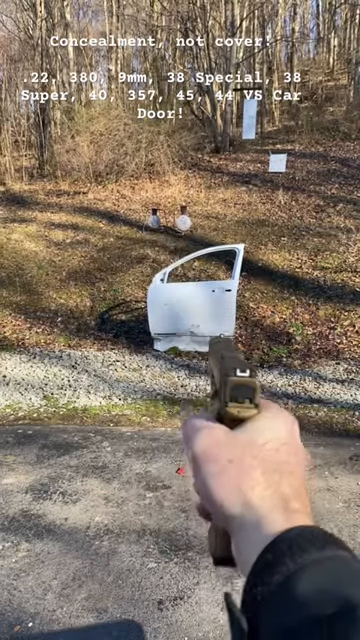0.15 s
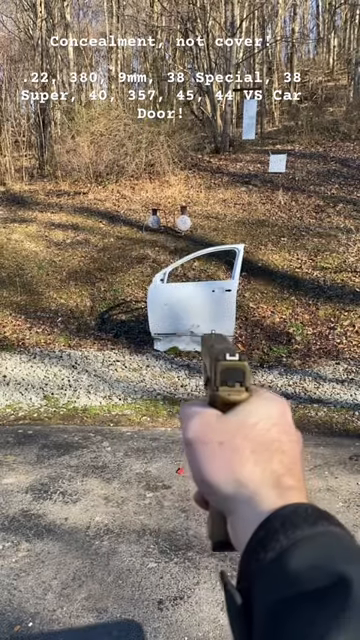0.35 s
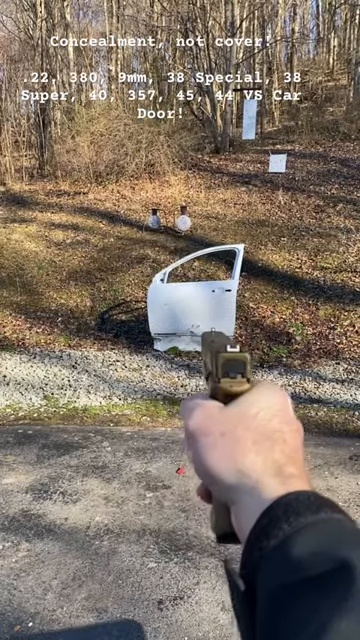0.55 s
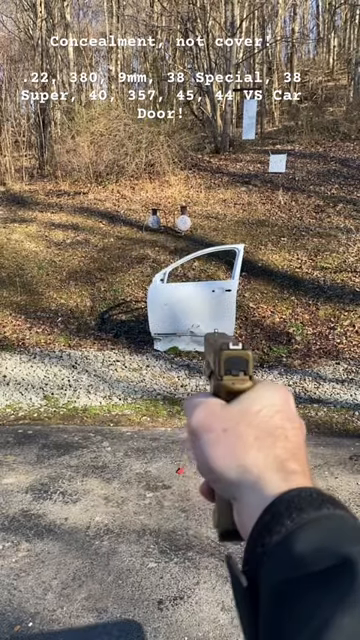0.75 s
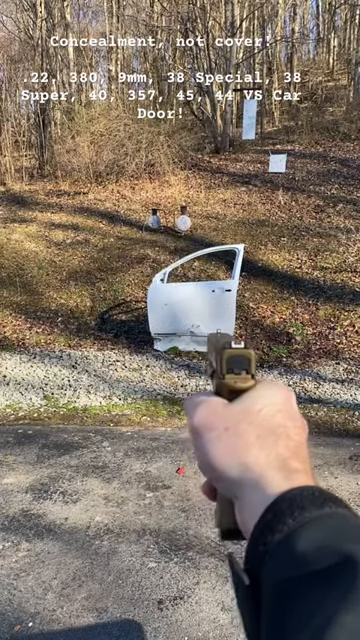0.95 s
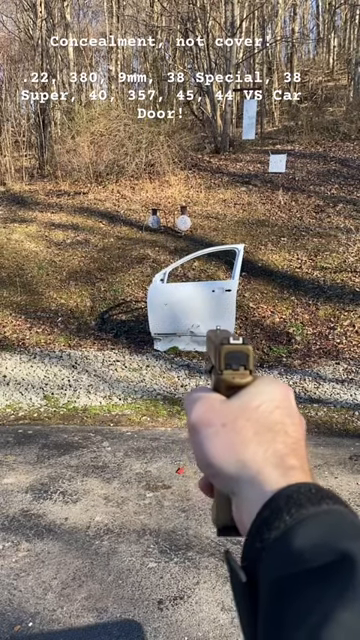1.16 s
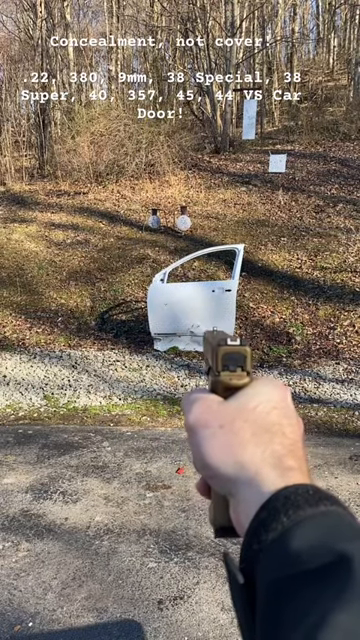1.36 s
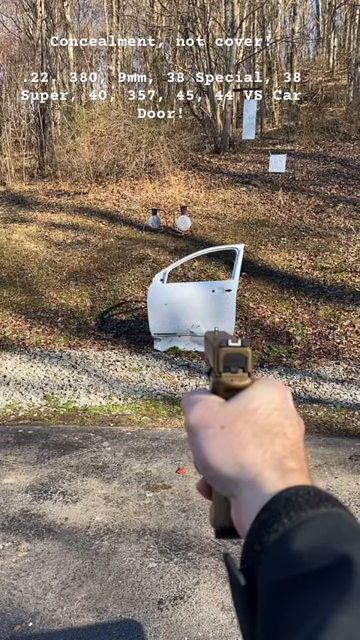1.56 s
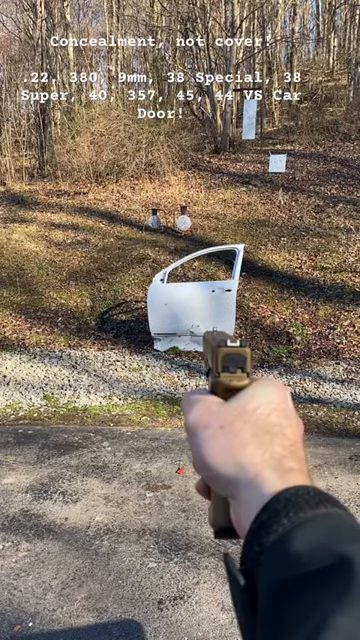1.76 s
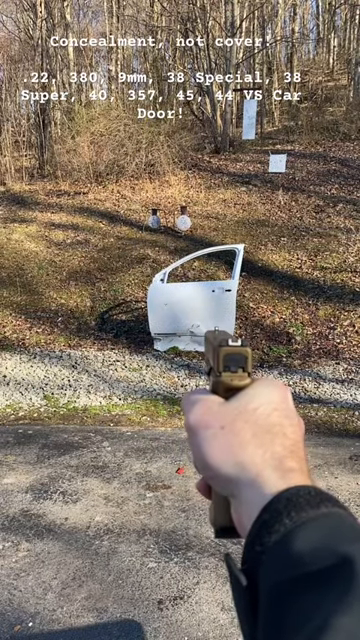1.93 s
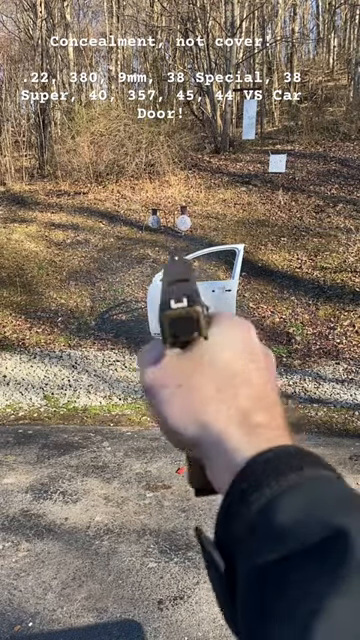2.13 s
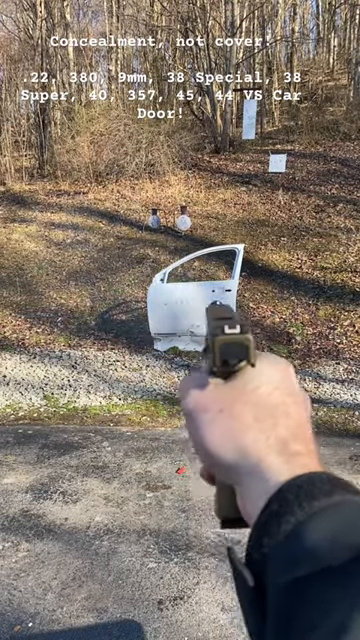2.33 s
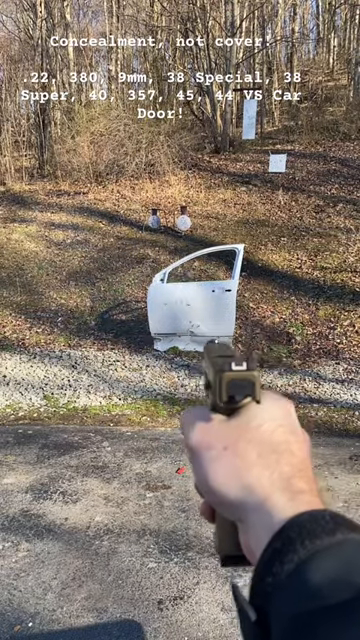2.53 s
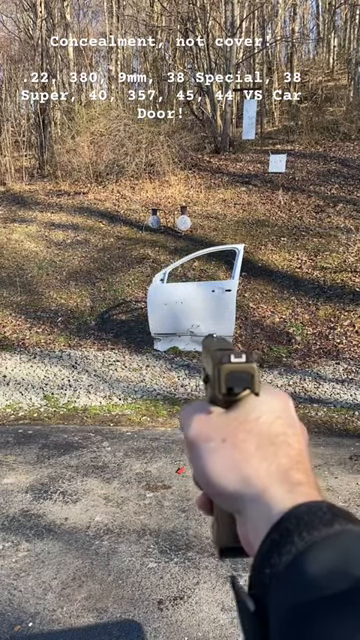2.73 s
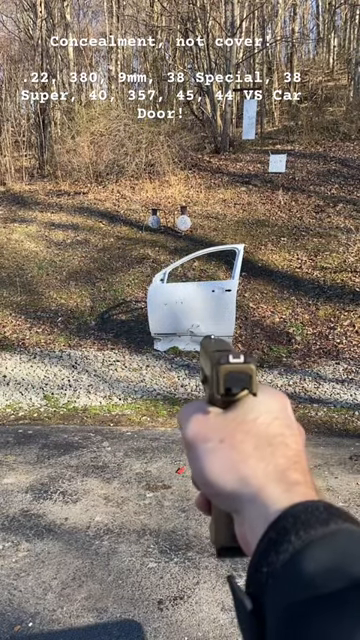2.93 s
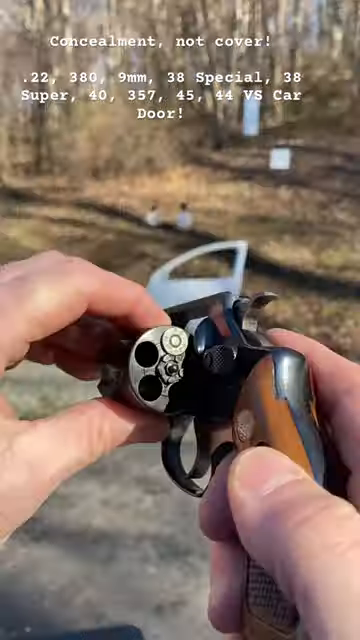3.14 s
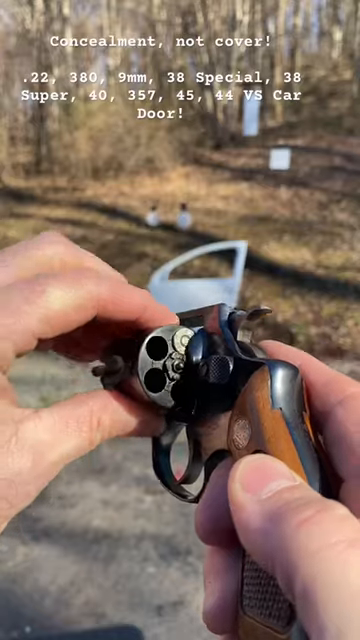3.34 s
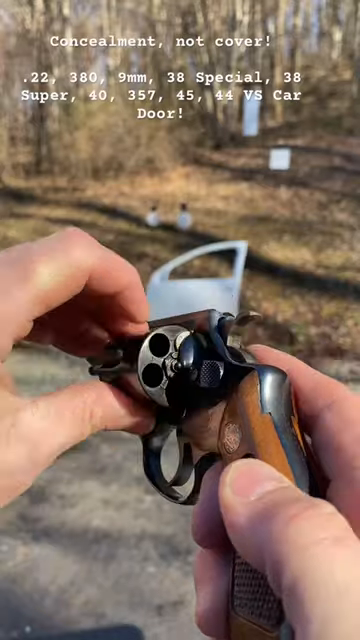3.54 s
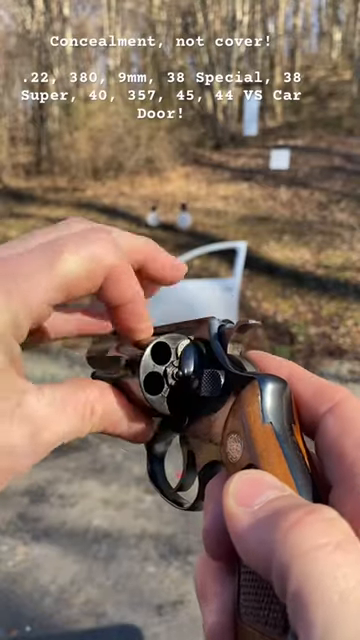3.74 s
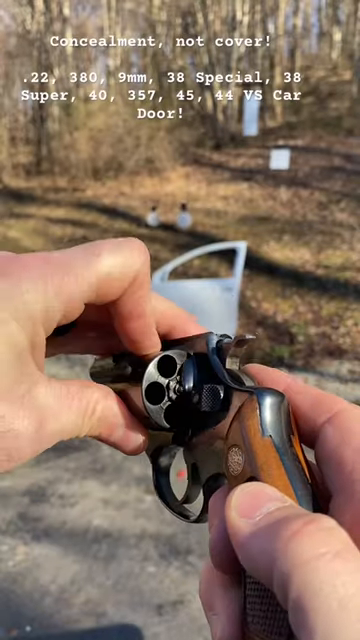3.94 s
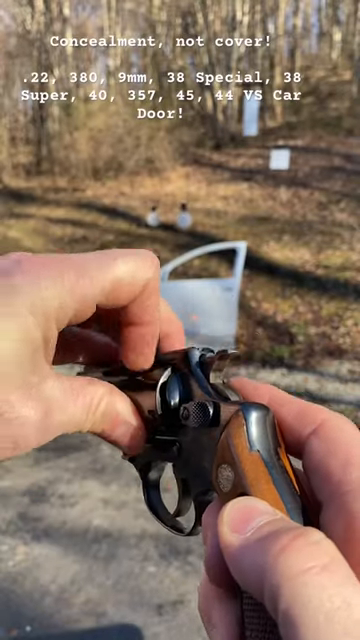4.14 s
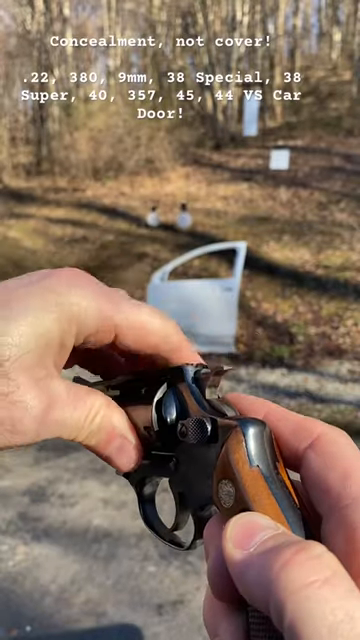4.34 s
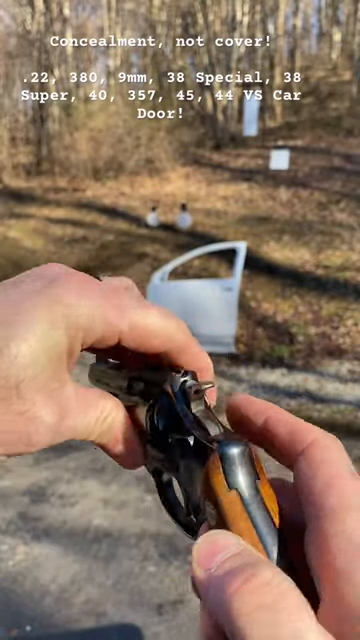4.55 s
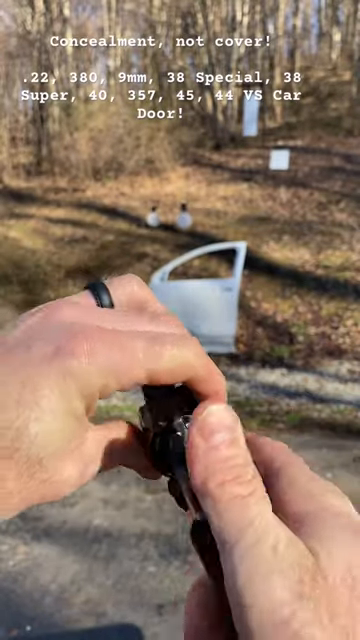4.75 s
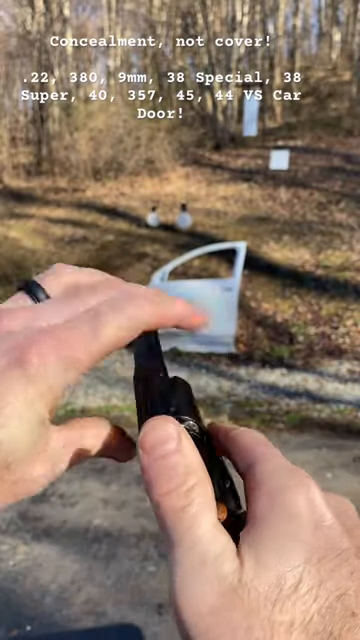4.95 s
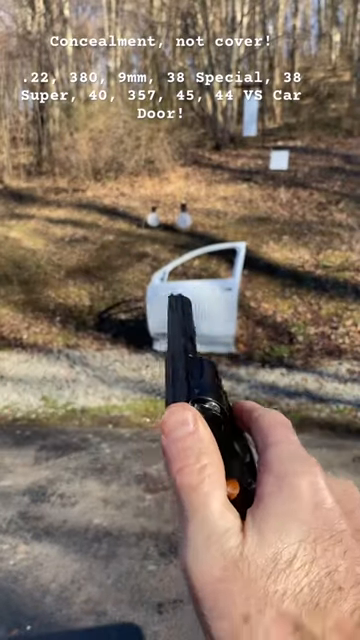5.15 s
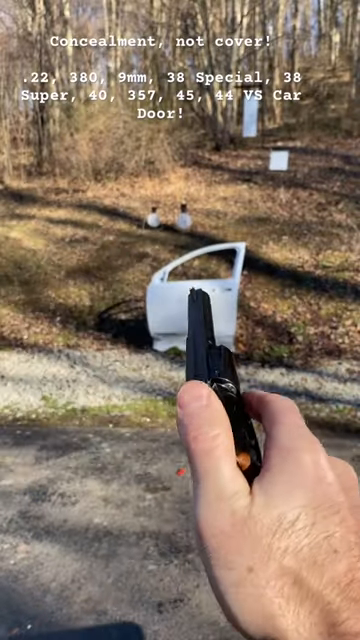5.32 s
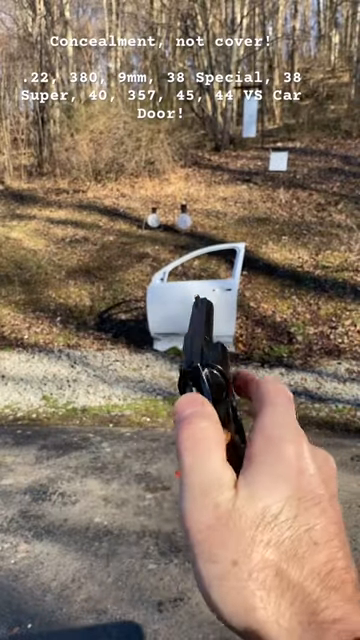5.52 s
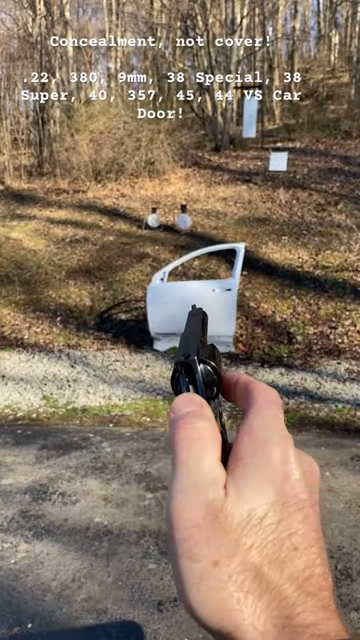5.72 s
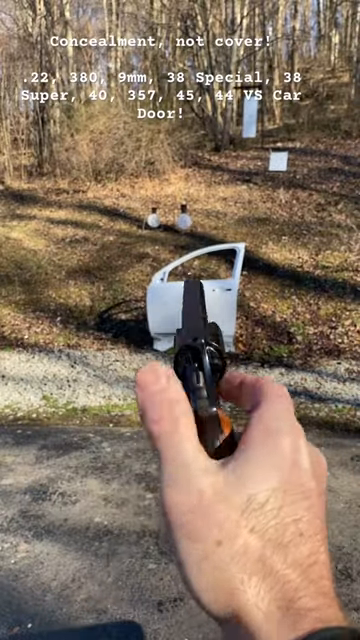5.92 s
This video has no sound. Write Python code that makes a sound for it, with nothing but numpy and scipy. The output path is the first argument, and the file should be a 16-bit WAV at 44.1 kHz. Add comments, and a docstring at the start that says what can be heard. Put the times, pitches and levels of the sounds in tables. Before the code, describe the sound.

Quiet wooded range, a single close gunshot with a metallic hit and rolling echo cut short, followed by crisp revolver handling clicks.

```python
"""Pistol shot, woodland echo, revolver handling

One pistol shot outdoors, heard from just behind the gun: shaped noise, chirps and pressure waves, rounded off
by overloaded microphones. The bullet slaps a car door (chirp, struck modes, rattle) and a wooded slope scatters
a long echo (filtered noise). The echo stops short and a revolver is handled: noise bursts ring its modes as
parts click and snap shut, and grainy noise makes the scuffs. Under it lie cloth rustle, faint high peeps,
rumble, air hiss and a distant hum."""
import sys
import numpy as np
from scipy import signal
from scipy.fft import rfft, irfft, next_fast_len
from scipy.io import wavfile
from scipy.ndimage import map_coordinates

SR = 44100
rng = np.random.default_rng(int(sys.argv[2]) if len(sys.argv) > 2 else 0)


def to_wav(sig):
    """Store sig (one row per channel, or 1-D mono) as 16-bit WAV at the path in sys.argv[1].

    Samples outside -1..1 are clipped; the rate is SR.
    """
    pcm = np.clip(np.atleast_2d(sig), -1, 1) * 32767
    pcm = np.round(pcm).astype(np.int16)
    wavfile.write(sys.argv[1], SR, pcm.T)  # frames by channels


N = 268113
T = np.arange(N) / SR
SHORT = T[:16384]  # time axis of a single event

SHOT_S, DOOR_S, CYLINDER_SHUT_S = 2.012, 2.0592, 3.967
# the echo and hum stop here, and the rumble and air step to their second level
BREAK_S = 3.132

# Spectra list f/Hz, level/dB per Hz, relative within each table.
# distant rumble
RUMBLE_TONE = [(20, -31), (32, -18), (42, -2), (70, 4.5), (125, -1), (160, -13), (250, -21), (600, -50.5),
               (3000, -85.5)]
# soft air hiss
AIR_TONE = [(60, -11.5), (200, 2.5), (400, -2), (1000, -4.5), (2200, -6.5), (4000, -15), (7000, -26.5),
            (9000, -37), (11000, -30.5), (16000, -46)]
# narrow band around the hum
DRONE_TONE = [(60, -43.5), (105, -18.5), (120, -2.5), (128, 0), (136, -7), (155, -20), (240, -52.5), (800, -89)]
# cloth and skin
RUSTLE_TONE = [(500, -11.5), (2000, -5.5), (4000, 1.5), (7000, 1.5), (9000, -12.5), (11000, -4),
               (16000, -30)]
# steel and skin scuffing
SCUFF_TONE = [(300, -29), (1000, -19), (1450, -2), (1900, -4), (2300, 2), (2750, 6), (3550, -11.5),
              (4350, 6.5), (5000, -1), (5900, -8.5), (6550, 5.5), (7300, -8), (8500, -20.5), (16000, -30.5)]
# skin part of a dull knock
SKIN_TONE = [(200, -2), (600, -10), (1100, 1), (2000, -4), (3200, -12), (6000, -34)]
# broad colour of a contact in the revolver
CONTACT_TONE = [(150, -28), (700, -15), (1000, -4.5), (1420, 1.5), (1800, -7), (2700, -3), (3850, -2.5),
                (4800, -1), (5500, 1.5), (7000, 6.5), (7750, 7), (8600, 2.5), (9500, -5), (10600, 5.5),
                (12200, -3.5), (13300, -10), (14500, 3), (15500, 1.5)]
# faint tail the ground returns after a contact
GROUND_TONE = [(500, -8), (1500, -6.5), (4000, 3.5), (7000, -3.5), (10000, -9.5), (16000, -16)]
# echo, before the path length recolours it
ECHO_TONE = [(40, -32.5), (100, -13.5), (200, -14), (355, -4.5), (620, -3.5), (850, -2.5), (1150, -4.5),
             (1460, -8.5), (2700, -13.3), (4340, -19.2), (7000, -29.3), (9000, -45), (11000, -44.5),
             (15500, -64)]
# distinct answers within the echo, before dulling
SLAP_TONE = [(80, -24.5), (190, 3), (330, 11.5), (750, 14), (1200, 14), (16000, -1.5)]
# first tick of the bullet on sheet steel
TICK_TONE = [(800, -11), (2000, -1), (4300, 0), (5500, -12.5), (7000, -7), (9000, -17.5), (16000, -23)]
# rattle of the door
RATTLE_TONE = [(60, -3), (300, -.5), (700, -1), (2000, -5.5), (4200, -12), (7000, -16), (9000, -27),
               (11000, -17.5), (16000, -33)]
# muzzle crack, before its resonances
CRACK_TONE = [(40, -10.5), (150, -10.5), (300, -2.5), (430, 1.5), (650, 4), (1000, -3), (1500, -16),
              (3000, -13.5), (4400, -14.5), (5900, -14.5), (7500, -16), (8700, -35.5), (16000, -42.5)]
# snap after the crack
SNAP_TONE = [(300, 0), (700, 6.5), (1500, -3), (4000, -4.5), (7000, 0), (9000, -13.5), (10500, 6),
             (13000, -9), (15500, -6.5)]
# gas and ground wash after the crack
WASH_TONE = [(30, -2), (90, -1), (170, -9), (300, -2), (700, -3.5), (1400, -8.5), (3000, -13),
             (6500, -15.5), (9000, -28), (11000, -22.5), (16000, -30)]
# bright spray off nearby gravel and leaves
SPRAY_TONE = [(300, -11), (1000, -.5), (4000, -6.5), (7000, -7), (9000, -13.5), (11000, -11.5), (16000, -16.5)]
# gravel and leaves stirred by the blast
STIR_TONE = [(400, -12.5), (1500, 0), (4000, -3), (8000, -15), (16000, -26.5)]

# stereo tilt of the crack: f/Hz, left minus right level/dB
CRACK_PAN = [(100, 8.5), (380, 6.5), (900, 3.5), (1400, 0), (2400, -10), (4400, -7.5), (8000, -3.5)]
# resonances of the crack: f/Hz, nominal width/Hz, level above the valleys/dB
CRACK_PEAKS = [(1970, 90, 10), (2350, 190, 10.5), (3090, 80, 14.5), (3400, 80, 11.5), (4030, 130, 16.5),
               (4950, 100, 11.5), (5400, 90, 9.5), (5800, 98, 16), (6310, 240, 14), (6650, 200, 12),
               (7600, 200, 10)]
# struck modes of the door's steel skin: f/Hz, level/dB, t60/s
DOOR_MODES = [(385, -5.5, 0.1), (640, -2, 0.066), (1340, -3.5, 0.063), (2090, -2.5, 0.03), (3300, -8, .04),
              (3920, -2, .04), (4330, -4, 0.046), (6530, -10.5, .04), (6740, -7.5, .045)]
# struck modes of the revolver, damped by the hand: f/Hz, level/dB, t60/s
GUN_MODES = [(1440, 4, 0.016), (2100, -9, .025), (2675, -4.5, 0.019), (3160, -2, 0.02), (3880, -1, 0.022),
             (4740, 4, 0.0083), (4620, -4.5, 0.022), (6020, 3.5, 0.019), (7130, -6, 0.027),
             (8240, 1.5, 0.017), (10620, -6, 0.014), (15250, -1.5, 0.0073)]
# faint ring of the cylinder once shut: f/Hz, level/dB, t60/s
CYLINDER_MODES = [(2616, -54.5, .078), (3730, -55.5, .22), (6710, -45, .05), (7138, -50, .055)]
# banks and stands of trunks that answer distinctly: t/s, length/s, level/dB, dull above f/Hz
SLAPS = [(2.079, 0.013, -29, 990), (2.106, 0.0075, -30.5, 1200), (2.1636, .002, -31.5, 2200),
         (2.224, 0.0074, -35.5, 600), (2.243, .012, -30, 1120), (2.266, .01, -33, 1500),
         (2.287, .012, -26, 520), (2.333, 0.021, -35, 1500), (2.364, 0.021, -28.5, 1390),
         (2.401, .016, -28, 615), (2.429, 0.0075, -33, 1000), (2.458, 0.013, -28.5, 603),
         (2.481, .008, -34.5, 1100), (2.557, 0.0069, -32, 790)]
# metal contacts in the gun: t/s, level/dB, centre f/Hz, spread/octaves, left minus right level/dB
CLICKS = [ (2.989, -55, 6950, 1.1, 4), (3.122, -45, 7000, 1.2, -1), (3.4175, -52.5, 4500, 2.2, 1),
          (3.4407, -35.5, 5030, 0.66, -1), (3.4412, -42, 1430, 0.68, 2), (3.9412, -27, 3300, 1.1, -3.5),
          (3.945, -33.5, 1390, 1.06, -1), (3.9505, -41, 13050, 1.2, 6), (3.9641, -13.5, 10500, .8, -5),
          (3.9646, -20, 2840, 0.31, -4), (3.967, -17, 6330, 0.43, -3), (3.9669, -14.5, 11000, 2.4, 9),
          (3.9684, -21, 3000, 2, 0), (4.122, -56, 9040, 0.78, 6.5), (4.498, -59, 4000, 1.1, 7),
          (4.829, -56.5, 4800, 1.0, 2.5), (5.4368, -38.5, 6800, 0.87, -5), (5.4478, -46.5, 4500, 1.1, 14),
          (5.462, -44, 10030, .7, -12), (5.465, -31, 6500, 0.53, 3), (5.4735, -50, 7970, 1.13, 1),
          (5.4997, -26, 8300, 0.67, 4.5), (5.5006, -25, 3380, 0.7, 2), (5.5002, -39, 1600, 0.5, 0),
          (5.503, -29, 6000, 0.57, 4), (5.5078, -39, 3700, 0.9, -6), (5.522, -13.5, 4680, 0.43, 2.5),
          (5.5217, -19, 8660, 0.21, 3.5), (5.522, -27, 6500, 1.6, -4), (5.5221, -32, 1900, 0.8, -1),
          (5.5248, -24, 7500, 0.56, 4), (5.5298, -35, 4700, 0.4, -4), (5.5322, -43, 6400, 0.35, -1),
          (5.817, -56, 3400, 0.56, -1), (5.833, -45, 4560, 0.45, 2), (5.8365, -41.5, 3700, .55, 1),
          (5.8423, -39.5, 2680, 0.13, -1), (5.843, -43, 6300, 0.25, 1), (5.8565, -59, 1450, 0.32, -1),
          (5.8753, -50, 1620, 0.64, -8)]
# tinkles of a loose steel part: t/s, level/dB
TINKLES = [(4.492, -55.5), (4.499, -54), (4.511, -56)]
# dull knocks of the gun in the hand: t/s, level/dB, t60/s
THUMPS = [(3.441, -56.5, 0.071), (3.965, -36.5, 0.057), (5.521, -57.5, 0.033), (6.013, -51, .025)]
# sliding parts and the hand on the grip: start t/s, time to full pressure/s, level/dB, t60/s
SCUFFS = [(3.94, 0.024, -39.5, 0.028), (5.436, 0.012, -56.5, 0.17), (5.485, 0.03, -48.5, .09),
          (5.806, 0.02, -56.5, 0.096), (5.829, 0.01, -45.5, 0.14), (5.852, 0.019, -58, 0.047),
          (6.012, 0.016, -60, 0.16)]
# moving sleeves and hands: start t/s, length/s, level/dB
RUSTLES = [(0, 0.5, -75.5), (2.701, 1.08, -75.5), (3.95, 0.5, -76), (4.429, 0.8, -72.5), (5.206, 1.08, -72)]
# faint high peeps: t/s, level/dB
PEEPS = [(.765, -83), (1.005, -81), (1.885, -82), (3.803, -65.5)]
# swells of the hum: loudest at t/s, half width/s, level/dB
DRONE_SWELLS = [(.05, 0.17, -63.5), (1.23, 0.15, -55.5), (1.88, 0.099, -55)]
# the background sinks for a while: start t/s, length for the air/s, length for the rumble/s, depth/dB
SINKS = [(2.019, 1.1, 1.085, 7), (3.985, .11, 0.26, 5.5)]

# background levels before and after BREAK_S
RUMBLE_DB, AIR_DB = (-59, -56.5), (-66.5, -63)
SINK_FADE_S, RUSTLE_FADE_S = .03, .049
DRONE_REST_DB, PEEP_HZ = -71.5, 7700
# a scuff is a dense run of slips of somewhat unequal size
SLIPS_PER_S, SLIP_SCATTER_DB, SLIP_T60_S = 1500, 3, .005
# every contact dies fast; a much weaker second tap is added just after it
CLICK_T60_S, SECOND_TAP_S, SECOND_TAP_DB, KNOCK_DB = .005, .0028, -16.5, -39
TREBLE_SPREAD = 1.05  # a contact's spread above its centre, relative to below
TINKLE_HZ, TINKLE_T60_S = 3470, .017
RIGHT_LAG_S = .000056  # the right channel hears the gun's sounds slightly later than the left
# the slope's echo builds up as the blast reaches more trunks, peaks, then dies away
ECHO_DB, ECHO_PEAK_S, ECHO_BUILD_DB_PER_S, ECHO_T60_S = -29, 2.361, 50.5, 2.465
ECHO_GRAIN_DB = 1.9
# the nearer bank answers first: level at the shot, and decay
BANK_DB, BANK_T60_S = -25.5, .34
CRACK_RISE_S = .005
TOP_HZ = 16200


def undb(db):
    """Decibels to gain."""
    return 10 ** (np.asarray(db) / 20)


def unit(x):
    """Scale to rms 1."""
    return x / np.sqrt(np.mean(x ** 2))


def bins(size):
    """Frequencies of a spectrum, kept off zero for the logarithm."""
    return np.maximum(np.fft.rfftfreq(size, 1 / SR), 1)


def tone(points, f):
    """A spectrum in dB, read on a log-frequency axis."""
    hz, db = np.transpose(points)
    return np.interp(np.log(f), np.log(hz), db)


def colour(x, db):
    """Causal filter with a gain in dB per bin, by folding the cepstrum."""
    size = x.shape[-1]
    fold = 1 + np.sign(size / 2 - np.arange(size))
    fold[0] = 1
    cepstrum = irfft(np.log(undb(db)), size)
    response = np.exp(rfft(cepstrum * fold))
    return irfft(rfft(x) * response, size)


def noise(points, size, apart_hz):
    """Stereo noise of a given spectrum: alike in both channels below apart_hz, unrelated above."""
    length = next_fast_len(size, True)
    f = bins(length)
    mid, side = np.exp(2j * np.pi * rng.random((2, len(f))))
    alike = 1 / (1 + (f / apart_hz) ** 2)
    pair = mid * np.sqrt(1 + alike) + side * np.sqrt(1 - alike) * np.array([[1], [-1]])
    return unit(irfft(pair * undb(tone(points, f)), length)[:, :size])


def walk(rate):
    """Smooth random drift with a spread near 1, changing rate times a second."""
    return 1.2 * np.interp(T * rate, np.arange(8192), rng.standard_normal(8192))


def swell(rise, hold, t60):
    """An envelope that rises, holds and dies away."""
    return np.minimum(SHORT / rise, 1) * undb(-60 * np.maximum(SHORT - rise - hold, 0) / t60)


def gate(start, length, fade):
    """1 during a stretch of time, with a soft edge on either side."""
    return np.clip(np.minimum(T - start, start + length - T) / fade + .5, 0, 1)


def ring(hz, t60):
    """One struck mode: a sine that dies away exponentially."""
    return np.sin(2 * np.pi * hz * SHORT) * np.exp(-np.log(1000) * SHORT / t60)


def ring_modes(modes):
    """All modes of a struck body together."""
    return sum(undb(db) * ring(hz, t60) for hz, db, t60 in modes)


def chirp(from_hz, to_hz, glide):
    """A tone that falls quickly from one pitch towards another."""
    hz = to_hz + (from_hz - to_hz) * np.exp(-SHORT / glide)
    return np.sin(2 * np.pi * np.cumsum(hz) / SR)


def pressure(push, round_hz):
    """Blast wave: a brief push, then a longer suction, with a rounded front."""
    wave = (1 - SHORT / push) * np.exp(-SHORT / push)
    wave = signal.sosfilt(signal.butter(2, round_hz, fs=SR, output="sos"), wave)
    return wave / wave.max()


def even(x):
    """Smooth the chance bumps out of a short burst's spectrum; its phase and energy stay."""
    spectrum = rfft(x)
    size = np.abs(spectrum)
    y = irfft(spectrum / (size + .25 * size.mean()), x.shape[-1])
    return y * np.sqrt(np.sum(x ** 2) / np.sum(y ** 2))


def resonances(peaks, f):
    """Gain in dB of a set of resonances standing above a flat valley."""
    power = 1
    for hz, width, db in peaks:
        power = power + undb(db) ** 2 / (1 + ((f - hz) / (.7 * width)) ** 2) ** 2
    return 10 * np.log10(power)


def pan(db):
    """Gains of the two channels for a left minus right level."""
    return undb(np.array([[1], [-1]]) * db / 2)


def add(out, s, x):
    """Mix a sound in at time s."""
    i = int(s * SR)
    out[:, i:i + x.shape[-1]] += x[..., :N - i]


def outdoors():
    """A wavering distant rumble and soft air hiss, both shaped noise; their levels sink for a while."""
    rumble = noise(RUMBLE_TONE, N, apart_hz=278.9)
    rumble = rumble * undb(np.where(T < BREAK_S, *RUMBLE_DB) + 1.4 * walk(rate=13))
    air = noise(AIR_TONE, N, apart_hz=430) * undb(np.where(T < BREAK_S, *AIR_DB))
    for s, air_s, rumble_s, db in SINKS:
        air = air * undb(-db * gate(s, air_s, SINK_FADE_S))
        rumble = rumble * undb(-db * gate(s, rumble_s, SINK_FADE_S))
    return rumble + air


def drone():
    """A far-off hum that comes and goes: a wavering tone in a narrow band of rumble."""
    band = noise(DRONE_TONE, N, apart_hz=500)
    hum_hz = 128 + 1.5 * walk(rate=12)
    hum = np.sin(2 * np.pi * np.cumsum(hum_hz) / SR)
    swells = sum(undb(db) * np.exp(-.5 * ((T - s) / width) ** 2) for s, width, db in DRONE_SWELLS)
    return (.64 * band + hum) * (undb(DRONE_REST_DB) + swells) * (T < BREAK_S)


def peep():
    """Faint, very high peeps, likely a small bird: a sine glides down and wavers in pitch."""
    out = np.zeros((2, N))
    for s, db in PEEPS:
        hz = PEEP_HZ + 400 * np.exp(-SHORT / .01) + 130 * walk(rate=450)[:len(SHORT)]
        whistle = np.sin(2 * np.pi * np.cumsum(hz) / SR)
        add(out, s, undb(db) * whistle * swell(rise=.015, hold=.011, t60=.09))
    return out


def rustle():
    """Cloth and skin brush softly and unevenly while the hands move: noise of drifting level."""
    moving = sum(undb(db) * gate(s, length, RUSTLE_FADE_S) for s, length, db in RUSTLES)
    return noise(RUSTLE_TONE, N, apart_hz=1500) * moving * undb(1.3 * walk(rate=28))


def scuff():
    """Steel and skin stick and slip on the gun: pressure builds, then lets go."""
    press = np.zeros((1, N))
    for s, rise, db, t60 in SCUFFS:
        add(press, s, undb(db) * swell(rise=rise, hold=.003, t60=t60))
    slips = (rng.random(N) < SLIPS_PER_S / SR) * undb(SLIP_SCATTER_DB * rng.standard_normal(N))
    slips = signal.fftconvolve(slips, swell(rise=.00019, hold=0, t60=SLIP_T60_S))[:N]
    return unit(noise(SCUFF_TONE, N, apart_hz=2960) * slips) * press * pan(-5.5)


def thumps():
    """Dull knocks of the gun against the hand: a tone falls quickly in pitch under a puff of noise."""
    out = np.zeros((2, N))
    for s, db, t60 in THUMPS:
        knock = chirp(from_hz=940, to_hz=115, glide=.0052) * swell(rise=.0047, hold=.0017, t60=t60)
        skin = noise(SKIN_TONE, len(SHORT), apart_hz=3000) * swell(rise=.001, hold=.0012, t60=.015)
        add(out, s, undb(db) * (knock + undb(-4) * skin))
    return out


def handling():
    """Each contact is a short burst and a weak second tap with the gun's modes and a faint ground tail."""
    out, size = np.zeros((2, N)), len(SHORT)
    f = bins(size)
    rings = np.array([undb(db) * ring(hz, t60) for hz, db, t60 in GUN_MODES])
    knock = ring(hz=330, t60=.0049) + .31 * ring(hz=215, t60=.038) + .5 * ring(hz=542, t60=.018)
    tap = swell(rise=.00039, hold=.00049, t60=CLICK_T60_S)
    taps = tap + undb(SECOND_TAP_DB) * np.interp(SHORT - SECOND_TAP_S, SHORT, tap)
    for s, db, hz, spread, pan_db in CLICKS:
        octaves = np.log2(f / hz) / np.where(f > hz, TREBLE_SPREAD, 1)
        contact_db = -np.minimum(4.35 * (octaves / spread) ** 2, 45)
        burst = even(rng.standard_normal(size) * taps) * (SHORT < .02)
        burst = colour(burst, tone(CONTACT_TONE, f))
        # every contact meets the modes at another spot
        modes = rng.uniform(.6, 1.4, (2, len(rings))) * rng.choice([-1, 1], len(rings))
        tail = noise(GROUND_TONE, size, apart_hz=1000) * swell(rise=.0045, hold=.0036, t60=.14)
        click = colour(burst + undb(-19.5) * modes @ rings + undb(-45) * tail, contact_db)
        # level the click's energy, as if spread over 3 ms
        click /= np.sqrt(np.sum(click ** 2) / (2 * .003 * SR))
        add(out, s, undb(db) * pan(pan_db) * (click + undb(KNOCK_DB) * knock))
    # the cylinder's snap leaves a thin steel ring
    add(out, CYLINDER_SHUT_S, ring_modes(CYLINDER_MODES))
    for s, db in TINKLES:
        add(out, s, undb(db) * ring(TINKLE_HZ, TINKLE_T60_S))
    late_right = map_coordinates(out[1], [(T - RIGHT_LAG_S) * SR], order=5)
    return np.array([out[0], late_right])


def echo_level():
    """The near bank's quick decay, plus the slope's slow bloom and fall."""
    late = T - ECHO_PEAK_S
    slope = undb(ECHO_DB + np.minimum(ECHO_BUILD_DB_PER_S * late, -60 * late / ECHO_T60_S))
    bank = undb(BANK_DB) * np.exp(-np.log(1000) * np.maximum(T - SHOT_S, 0) / BANK_T60_S)
    return np.hypot(slope, bank)


def woods():
    """Countless trunks scatter the shot as noise; the longer the path, the more treble the air takes."""
    scatter = noise(ECHO_TONE, N, apart_hz=686) * undb(ECHO_GRAIN_DB * walk(rate=400))
    f, s, frames = signal.stft(scatter, SR, nperseg=512)
    path = np.clip(s - 2.4, -.4, .8)  # travel time in s, relative to about the echo's peak
    loss_db = 8.1 * (f[:, None] / 2000) ** 1.49 * path
    thin_db = 8 * np.maximum(path, 0) / (1 + (f[:, None] / 190) ** 4)  # far trunks return little bass
    frames = frames * undb(-np.maximum(loss_db, -11) - thin_db)
    scatter = signal.istft(frames, SR, nperseg=512)[1][:, :N]
    out = scatter * echo_level() * np.clip((T - DOOR_S) / .013, 0, 1)
    f = bins(len(SHORT))
    for s, length, db, dull_hz in SLAPS:
        slap = noise(SLAP_TONE, len(SHORT), apart_hz=900)
        slap = unit(colour(slap, -10 * np.log10(1 + (f / dull_hz) ** 3)))
        add(out, s, undb(db) * slap * swell(rise=.003, hold=length, t60=.035))
    return out * np.clip((BREAK_S - T) / .0023, 0, 1)


def door():
    """The bullet hits sheet steel: a tick, bending waves treble first, then the panel rings and rattles."""
    out, size = np.zeros((2, N)), len(SHORT)
    slap = chirp(from_hz=3900, to_hz=260, glide=.0019) * swell(rise=.000082, hold=.0071, t60=.017)
    tick = noise(TICK_TONE, size, apart_hz=5000) * swell(rise=.0003, hold=.0013, t60=.0065)
    panel = ring_modes(DOOR_MODES)
    rattle = noise(RATTLE_TONE, size, apart_hz=2533) * swell(rise=.0011, hold=.001, t60=.12)
    add(out, DOOR_S, undb(-15.5) * slap + undb(-16.5) * tick)
    add(out, DOOR_S, undb(-22.5) * panel + undb(-20.5) * rattle)
    return out


def shot():
    """Crack, snap, pressure wave and the wash of gas and ground reflections."""
    out, size = np.zeros((2, N)), len(SHORT)
    f = bins(size)
    burst = rng.standard_normal((2, size)) * swell(rise=CRACK_RISE_S, hold=.0058, t60=.042)
    burst = even(burst) * (SHORT < .1)
    tilt_db = np.array([[1], [-1]]) * tone(CRACK_PAN, f) / 2
    crack = colour(burst, tone(CRACK_TONE, f) + resonances(CRACK_PEAKS, f) + tilt_db)
    crack *= np.sqrt(np.mean(burst ** 2) / np.mean(crack ** 2))
    add(out, SHOT_S, undb(-9.5) * crack)
    # a hollow low ring, strongest and earliest in phase on the left
    hollow = np.sin(2 * np.pi * 283 * (SHORT - np.array([[0], [.0008]])))
    add(out, 2.0152, undb(-12) * pan(11) * hollow * swell(rise=.0075, hold=.011, t60=.02))
    snap = noise(SNAP_TONE, size, apart_hz=3000) * swell(rise=.00039, hold=.00081, t60=.0044)
    add(out, 2.0253, undb(-9) * snap)
    # the snap drops into a low thud, mostly on the right
    thud = chirp(from_hz=2300, to_hz=380, glide=.0011) * swell(rise=.0015, hold=.0024, t60=.008)
    add(out, 2.026, undb(-11.5) * pan(-7) * thud)
    # the slow part of the blast: a push, a bass rebound, a low ring and a long suction
    add(out, 2.0318, undb(-4.5) * pressure(push=.003, round_hz=900))
    add(out, 2.0365, -undb(-14) * pressure(push=.004, round_hz=216))
    add(out, 2.0312, undb(-6) * ring(hz=100, t60=.04))
    add(out, 2.038, -undb(-20) * np.sin(np.pi * np.minimum(SHORT / .023, 1)))
    wash = noise(WASH_TONE, size, apart_hz=250) * swell(rise=.0012, hold=.004, t60=.096)
    add(out, 2.026, undb(-14.5) * wash)
    spray = noise(SPRAY_TONE, size, apart_hz=2000) * swell(rise=.016, hold=.016, t60=.29)
    stir = noise(STIR_TONE, size, apart_hz=2000) * swell(rise=.0057, hold=.006, t60=.03)
    add(out, 2.046, undb(-28.5) * stir)
    add(out, 2.04, undb(-35) * spray * undb(2.3 * walk(rate=480)[:size]))
    return out


def scene():
    """All sources, left and right."""
    blast = shot() + door() + woods()
    gun_in_hand = handling() + thumps() + scuff() + rustle()
    background = peep() + drone() + outdoors()
    return blast + gun_in_hand + background


def record(dry):
    """The microphones round off the blast; the top is cut above TOP_HZ."""
    rounded = dry / (1 + (dry / .87) ** 4) ** .25
    return signal.sosfilt(signal.ellip(8, .2, 70, TOP_HZ, fs=SR, output="sos"), rounded)


dry = scene()
out = record(dry)
to_wav(out)
```